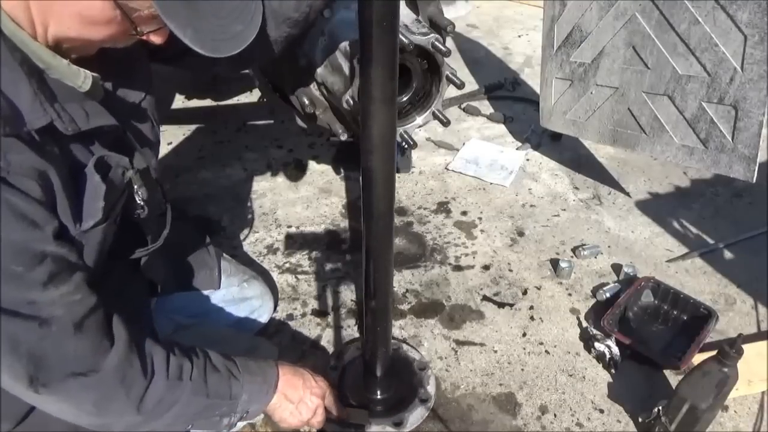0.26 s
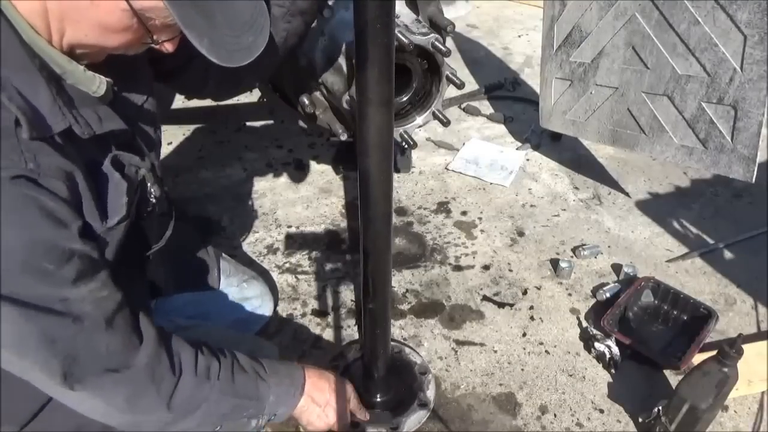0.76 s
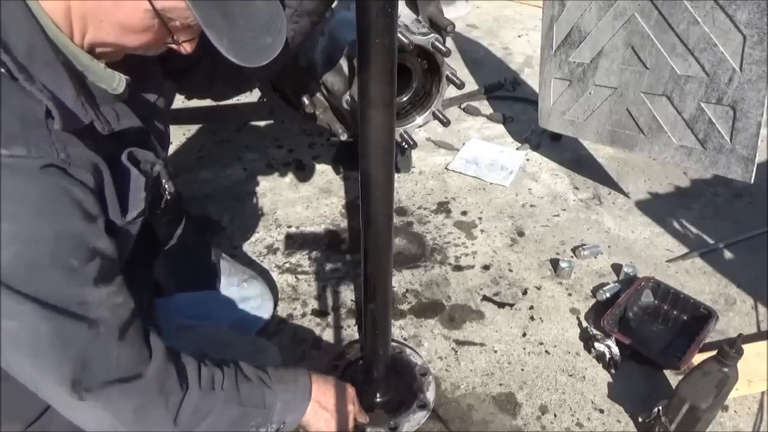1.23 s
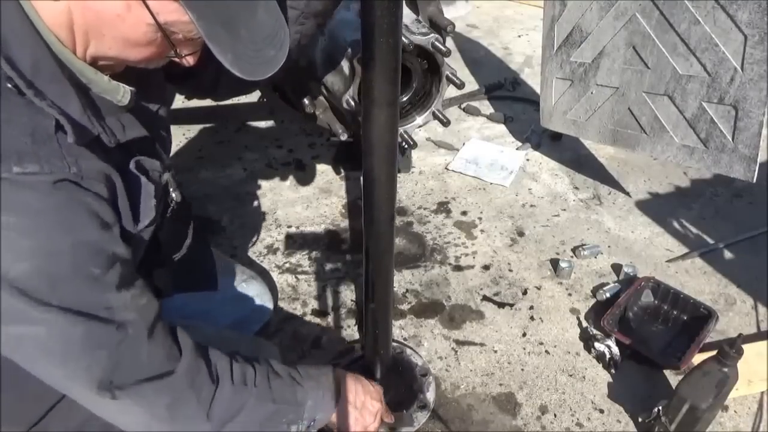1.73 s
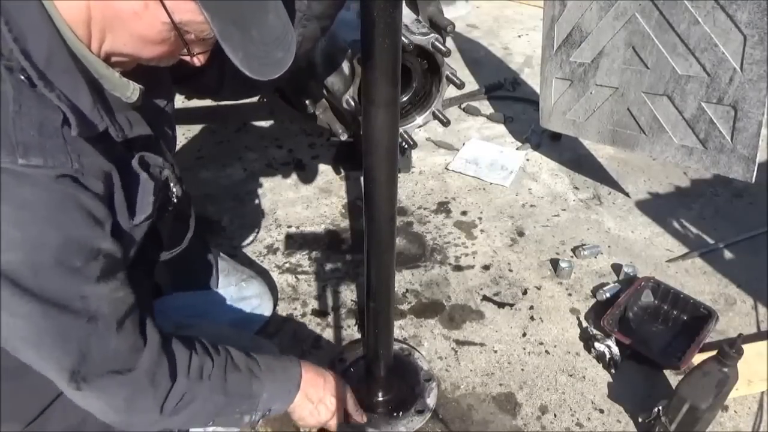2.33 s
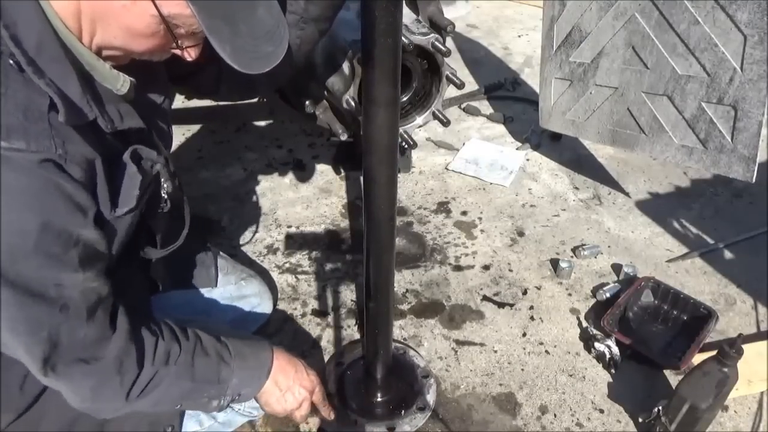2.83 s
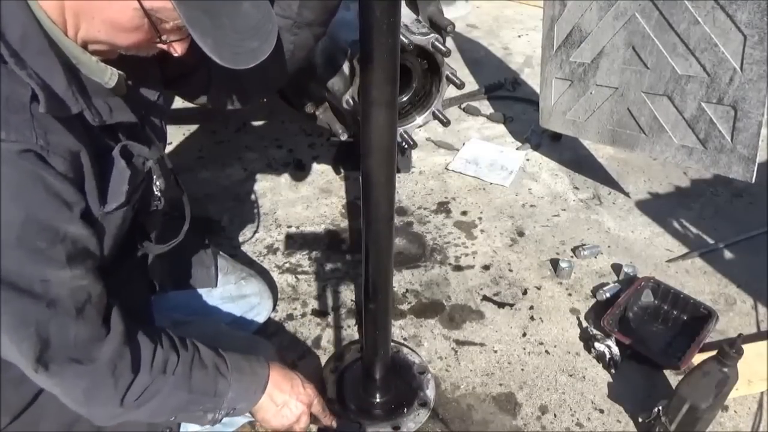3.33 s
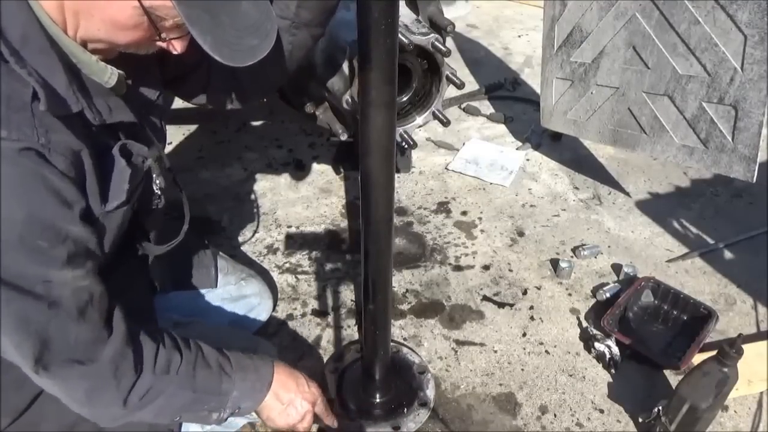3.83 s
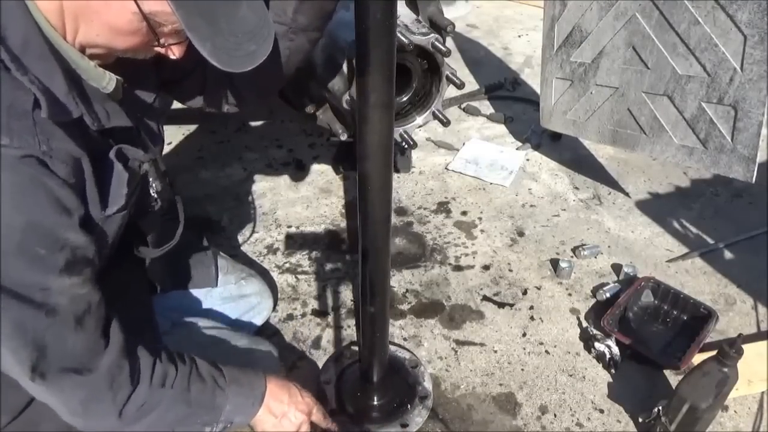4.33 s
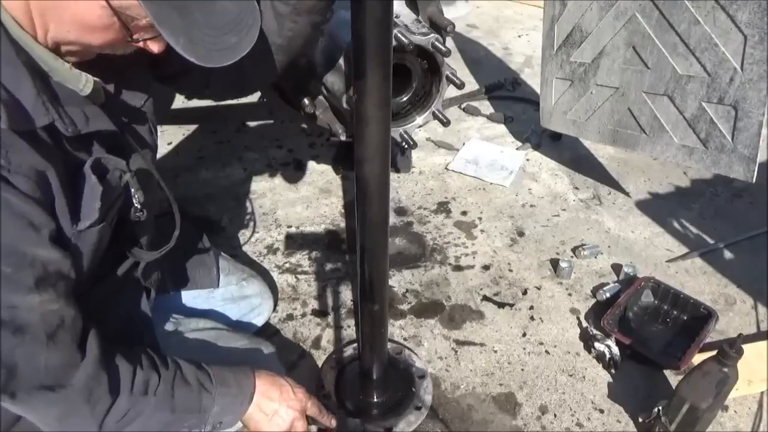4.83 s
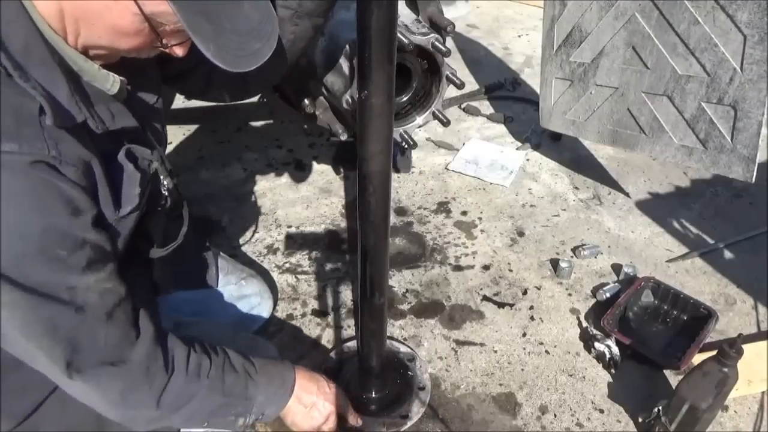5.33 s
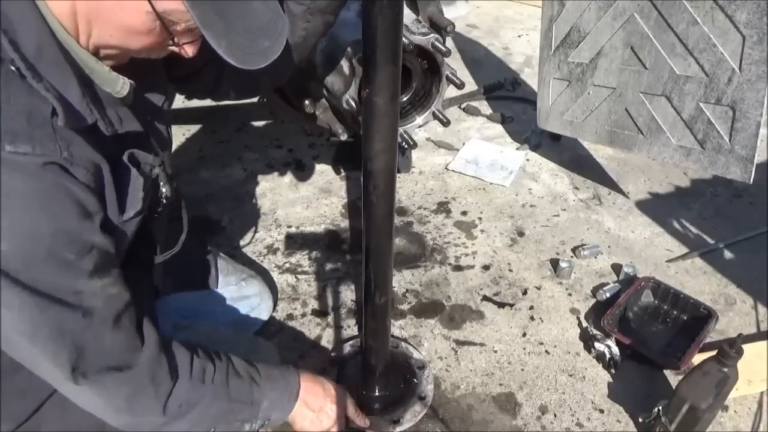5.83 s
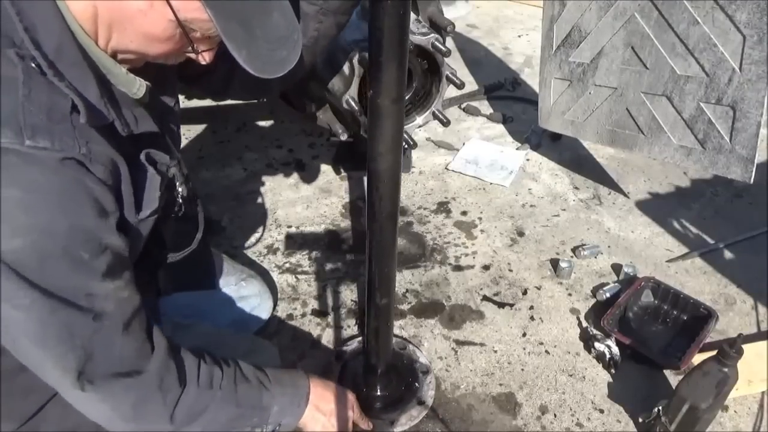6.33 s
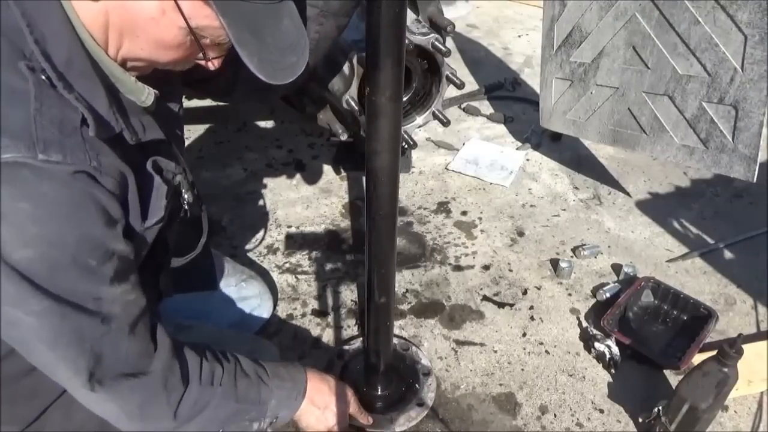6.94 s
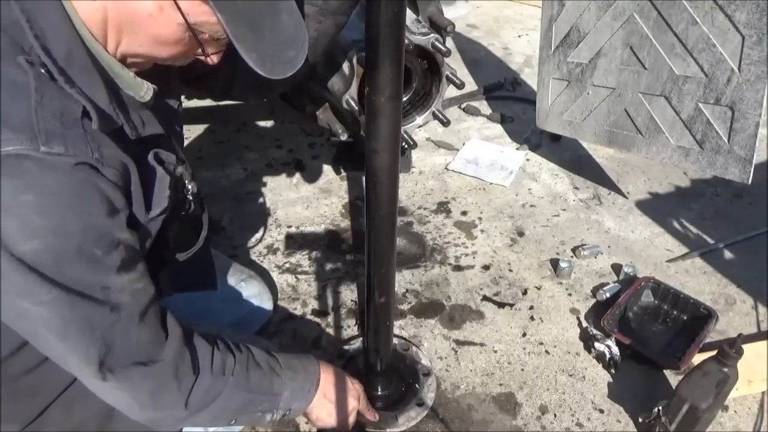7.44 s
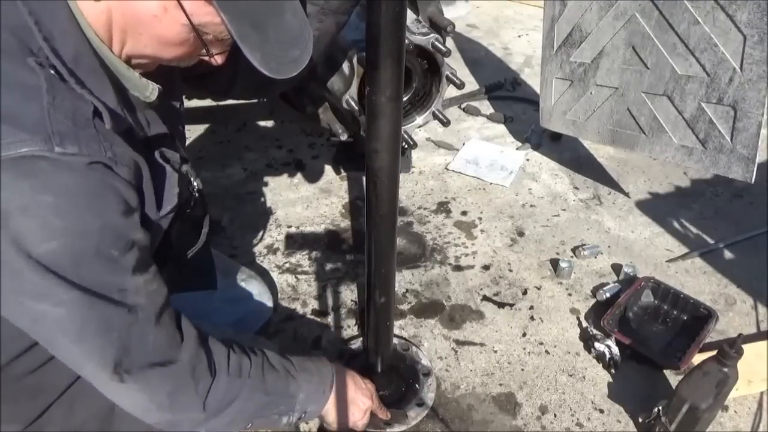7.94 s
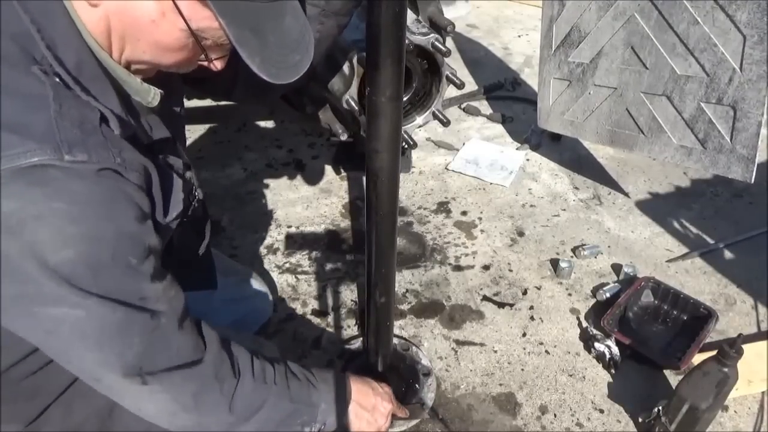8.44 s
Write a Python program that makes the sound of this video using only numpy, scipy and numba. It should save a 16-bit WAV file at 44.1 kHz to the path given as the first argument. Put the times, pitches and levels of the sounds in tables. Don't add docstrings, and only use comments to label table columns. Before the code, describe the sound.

Fast dry scrapes of a putty knife on steel come in runs: a strong early run, a broken middle with clicks and light contact, another vigorous run, a pause with taps, then softer ringing strokes. The sound is close, crisp and bassless, with only a short scatter off open concrete. Soft far traffic stays beneath, and low wind gusts buffet the microphone near the end.

```python
import sys
import numpy as np
from scipy import signal
from scipy.io import wavfile
from numba import njit

SR = 44100
rng = np.random.default_rng(int(sys.argv[2]) if len(sys.argv) > 2 else 0)


def persist_wave(psi):
    counts = np.round(np.clip(psi, -1, 1) * 32767).astype(np.int16)
    wavfile.write(sys.argv[1], SR, np.atleast_2d(counts).T)


def makeup_ratio(level_db):
    decades = np.asarray(level_db, float) / 20
    return 10 ** decades


N = 382347

# fastest moment in seconds, length in seconds, rasp level in dB,
# flange ring in dB relative to the rasp.
PUSH_STROKES = [(0.15, 0.12, -39, -5), (0.745, 0.089, -24.5, -6.5), (1.068, 0.089, -23.5, -7),
                (1.416, 0.086, -27, -9.5), (1.718, 0.062, -26, -4), (1.989, 0.053, -31.5, 1.5),
                (2.316, 0.075, -27.5, -2.5), (2.586, 0.051, -32.5, 3.8), (2.819, .02, -39.5, 4.5),
                (3.098, .066, -37.5, -0.3), (3.428, 0.075, -33.5, 2), (3.692, 0.063, -29, .3),
                (3.952, 0.061, -23.5, -0.5), (4.412, 0.082, -34.5, -3.5), (4.5, 0.056, -46.5, 3),
                (5.257, .088, -30, -4.5), (5.559, 0.073, -22, -4.5), (5.875, 0.082, -26, -1.5),
                (6.159, 0.061, -26, -6), (7.108, 0.052, -40, 0), (7.354, 0.052, -36.5, 2.5),
                (7.604, 0.059, -38, 4), (7.857, 0.063, -34, 5), (8.137, 0.07, -29.5, -2),
                (8.436, 0.076, -31, -1.5)]
PULL_STROKES = [(0.233, 0.1, -39, -6), (0.525, 0.077, -43.5, -6), (0.896, 0.074, -28.5, -9),
                (1.257, 0.083, -30, -7.5), (1.577, 0.079, -26.5, -15), (1.879, 0.085, -32.5, -3.5),
                (2.165, 0.083, -23.5, -7.5), (2.435, 0.051, -23.5, -13.5), (2.462, 0.082, -29.5, -2.5),
                (2.72, 0.083, -32, -3.5), (2.979, 0.04, -42, -2.5), (3.165, .058, -48.5, -4),
                (3.281, 0.045, -37, -4), (3.559, 0.062, -35, -2.5), (3.825, .058, -30, -7.5),
                (4.104, 0.071, -26.5, -12.5), (4.632, 0.098, -46.5, -3.5), (5.419, 0.064, -26.5, -10),
                (5.689, 0.06, -27.5, -4.5), (5.725, 0.1, -40.5, 2.5), (6.019, .055, -29, -4.5),
                (6.297, .05, -41.5, -3), (6.403, 0.019, -50.5, -6), (7.0, 0.032, -49.5, 3),
                (7.241, 0.05, -39, -4.5), (7.485, 0.048, -38.5, -3), (7.739, 0.048, -36, -7),
                (8.009, 0.064, -34, -6), (8.287, 0.069, -30.5, -7), (8.597, 0.077, -35, -6.5)]
PUSH_RISE, PULL_RISE = 0.54, 0.58
PUSH_EDGE_DB, PULL_EDGE_DB, EDGE_PER_DB = -1.06, -1, -0.13
HALF_GRIP_DB = -32.5

# frequency in Hz, width in Hz, level in dB, left minus right in dB.
BLADE_RESONANCES = [(1544, 53, -24.5, 3.5), (2170, 360, -13, 0), (2515, 86, -22.5, -15),
                    (3380, 540, -19.5, -4), (4310, 480, -9, 2), (5260, 1000, -14, 2.5),
                    (6356, 510, -1.5, 2.5), (7150, 500, -10.5, 6.5), (7805, 550, -8, 2.5),
                    (8880, 1100, -12, -8), (9556, 960, -3.5, 0.3), (10180, 800, -7, 1),
                    (10720, 500, -11, 1)]
# time in seconds, gain in dB of the upper edge
BLADE_BOW = [
    (0, -1),
    (2, -3),
    (4.4, -3.5),
    (5.2, -1),
    (6.4, -4.5),
    (7.1, 5),
    (8.6, 1),
]

# frequency in Hz, number of the mode family.
FLANGE_MODES = [(937, 1), (1421, 1), (1927, 2), (2025, 2), (2626, 0), (2830, 3), (3322, 3), (3774, 3),
                (4248, 4), (4834, 4), (4919, 3), (5933, 4), (6380, 4), (7000, 3), (7795, 3), (8354, 4),
                (8852, 3), (9020, 3), (9652, 3), (10135, 3), (10790, 3), (10919, 4)]
# level in dB, free decay time t60 in seconds, left minus right in dB.
FLANGE_RINGS = [(-12.5, 0.11, 4), (-11, 0.4, 1), (-11.5, 0.44, 0), (-5.5, 0.41, 2), (3.5, 0.24, 0),
                (-22, 0.26, 1), (-12.5, 0.5, 0), (-18.5, 0.28, 7), (-8.5, 0.3, -0.5), (-26.5, 0.25, 17),
                (-20.5, 0.44, 0), (-9, 0.32, 0), (-8.5, 0.16, 4), (-33, 0.77, 17), (-29, 0.65, -8),
                (-15, 0.24, -0.5), (-44, 0.31, 4), (-30, .5, 2), (-15.5, 0.42, -1), (-38, .4, 23),
                (-41, 0.2, 53), (-12, 0.18, -14.5)]
# dB per step towards the rim, dB per step round it, offset in dB.
MODE_FAMILIES = [
    (0, 0, -2),
    (1.2, 0.07, 1.77),
    (1.04, 0.52, -0.4),
    (1.12, 0.07, 0),
    (0.28, 1.14, -0.5),
]
# time in seconds, steps towards the rim, steps round the rim.
CONTACT_PATH = [(0.0, 3, 0), (0.36, 10, 3), (0.75, -2.5, 5.5), (1.08, -5, 4.5), (1.44, 1, -3.5),
                (2.16, -5, 4.5), (2.88, -3.5, -4.5), (3.24, -2.5, 0), (3.96, -4, 1), (4.32, 3.5, -3),
                (4.68, 7.5, -2), (5.04, 0.5, -3), (5.76, -9, 1), (6.48, 5.5, 2.5), (6.84, 0.5, -0.5),
                (7.56, 1, -10), (7.92, -2.5, -1.5), (8.64, -3.5, -3.5)]
PRESS_DAMP = 3.1
REST_DAMP, REST_S = 20.8, 0.063

# time in seconds, peak in dB, low flange modes in dB, high flange modes in dB,
# crack length in seconds.
BLADE_TAPS = [(0.393, -42, -21, -10, 0.0013), (2.82, -25.5, -15, -14, 0.002), (3.24, -32, -34, -41, 0.0025),
              (4.1794, -30, -21, -29, 0.0014), (4.2752, -39.5, 3.5, -30, 0.00095),
              (4.4544, -17, -24, -27, 0.0012), (4.7696, -40, -4, -20, 0.0015),
              (5.0089, -21.5, -29, -25, 0.0033), (6.6149, -30, -45, -19, 0.00098),
              (6.6328, -21.5, -33, -31, 0.0028), (6.7779, -23, -31, -25, 0.0038),
              (6.9875, -37, -22, -30, 0.002), (7.375, -42, -22, -5, 0.001), (7.62, -42, -17, -10, 0.001),
              (7.885, -39, -22, -6, 0.001), (6.4118, -18.5, -6, -27, 0.0029)]
# time in seconds, peak in dB.
EDGE_CATCHES = [
    (1.2027, -23),
    (3.903, -31),
    (4.3635, -14),
    (5.499, -11),
    (5.8228, -12),
    (6.12, -12),
    (7.3163, -23),
    (7.5666, -17.5),
    (7.811, -18),
    (8.098, -11.5),
]
# time in seconds, ring level in dB, fade in seconds.
NUDGES = [(0.002, -36.5, 0.015), (0.3, -59, .02), (0.408, -46.5, 0.094), (2.84, -41, .02),
          (2.9, -34.5, 0.019), (4.178, -30.5, .018), (4.283, -36.5, 0.019), (4.68, -50, 0.079),
          (4.771, -40, 0.09), (4.93, -37.5, 0.038), (5.044, -39, 0.0082), (5.07, -68, 0.055),
          (6.385, -39, 0.021), (6.46, -56, .08), (6.57, -58, .04), (6.64, -54, .012), (6.79, -61, .012),
          (6.82, -56, 0.075), (6.93, -65, .04)]
NUDGE_RISE_S, NUDGE_RASP_DB = 0.016, -25

# strongest moment in seconds, level in dB, half length in seconds.
WIND_GUSTS = [(0.236, -62, 0.067), (1.22, -73, 0.11), (1.87, -56.5, 0.027), (2.92, -75, 0.13),
              (3.6, -59.5, 0.19), (4.26, -55, 0.054), (4.9, -55, 0.1), (5.618, -66, 0.3),
              (6.417, -61, 0.043), (6.807, -42, 0.045), (7.298, -31, 0.021), (7.476, -41.5, 0.058),
              (7.72, -39, 0.046), (7.848, -31, 0.065), (8.026, -34, 0.048), (8.166, -37, 0.046),
              (8.376, -33.5, 0.061), (8.582, -36.5, 0.048)]
BREEZE_DB = -75
# frequency in Hz, level in dB per Hz.
TOWN_SPECTRUM = [(18, -33), (30, 0), (89, 0.5), (466, -9), (782, -4), (1810, -14), (2000, -13.5),
                 (2380, -26), (2690, -22), (3040, -21.5), (11000, -22), (14300, -57), (22000, -120)]
TOWN_DB = -52


def level(x, db):
    return x * makeup_ratio(db) / np.sqrt(np.mean(x ** 2))


def band(x, hz, width):
    return signal.lfilter(*signal.iirpeak(hz, hz / width, SR), x)


def walk(rate):
    levels = rng.standard_normal(4000)
    return 1.2 * np.interp(np.arange(N) * rate / SR, np.arange(len(levels)), levels)


def pan(x, db):
    return x * makeup_ratio(np.array([[db], [-db]]) / 2)


def swell(s, rise, fall, edge=2.53):
    first, last = max(int((s - 0.5) * SR), 0), min(int((s + 0.5) * SR), N)
    i = np.arange(first, last)
    late = i / SR - s
    return i, np.exp(-np.abs(late / np.where(late < 0, rise, fall)) ** edge)


def strokes():
    power = np.full((3, N), 1e-12)
    pushes = PUSH_STROKES, PUSH_RISE, PUSH_EDGE_DB
    pulls = PULL_STROKES, PULL_RISE, PULL_EDGE_DB
    for rows, share, edge_db in (pushes, pulls):
        for s, length, rasp_db, ring_db in rows:
            i, bell = swell(s, share * length, (1 - share) * length)
            tilt_db = edge_db + EDGE_PER_DB * (rasp_db - HALF_GRIP_DB)
            power[:, i] += makeup_ratio(rasp_db + np.array([[0], [ring_db], [tilt_db]])) ** 2 * bell
    return np.sqrt(power)


def grit(shared, own_db, rate):
    slips = makeup_ratio(shared + own_db * walk(rate))
    return level(slips * rng.standard_normal(N), 0)


def blade(rasp, edge, crack):
    slips = 1.9 * walk(330) + 1.2 * walk(60)
    bow_db = np.interp(np.arange(N) / SR, *np.transpose(BLADE_BOW))
    out = 0
    for hz, width, db, pan_db in BLADE_RESONANCES:
        share = np.clip((hz - 6500) / 2500, 0, 1)
        bow_share = np.clip((hz - 9900) / 200, -1, 1) * (hz > 9000)
        patches = makeup_ratio(2.7 * walk(18) + bow_db * bow_share)
        speed = rasp ** (1 - share) * edge ** share
        drive = speed * patches * grit(slips, own_db=1.5, rate=200)
        tone = band(band(drive + 0.95 * crack, hz, 1.47 * width), hz, 1.47 * width)
        out = out + pan(makeup_ratio(db) * np.sqrt(SR / width / 6) * tone, pan_db)
    return out


@njit
def ring(x, turn, loss):
    y, z = np.empty(len(x)), 0j
    for i in range(len(x)):
        z = z * turn * (1 - loss[i]) + x[i]
        y[i] = z.imag
    return y


def flange(drive, rasp, blows):
    grip = rasp / (rasp + makeup_ratio(HALF_GRIP_DB))
    low_blows, high_blows = blows
    rest = signal.lfilter([1], [1, -np.exp(-1 / (REST_S * SR))], 1. * (low_blows > 0))
    force = drive * grit(0.72 * walk(90), own_db=2.5, rate=300)
    s, *place = np.transpose(CONTACT_PATH)
    out_step, round_step = (np.interp(np.arange(N) / SR, s, step) for step in place)
    favour = [out_db * out_step + round_db * round_step + db for out_db, round_db, db in MODE_FAMILIES]
    out = 0
    for (hz, family), (db, t60, pan_db) in zip(FLANGE_MODES, FLANGE_RINGS):
        linger = REST_DAMP * np.minimum(rest, 1) * (hz < 3000)
        loss = (np.log(1000) / t60 + PRESS_DAMP * grip + linger) / SR
        high = np.clip(np.log(hz / 1400) / 0.8, 0, 1)
        blow = low_blows ** (1 - high) * high_blows ** high
        node = makeup_ratio(favour[family] + 1.75 * walk(4.945))
        push = node * (0.04 * force + 1.5 * blow)
        out = out + pan(makeup_ratio(db) * ring(push, np.exp(2j * np.pi * hz / SR), loss), pan_db)
    return out


def taps():
    crack, blows = np.zeros(N), np.zeros((2, N))
    catches = [(s, db - 12.0, -30, -30, 0.004) for s, db in EDGE_CATCHES]
    for s, db, low_db, high_db, length in list(BLADE_TAPS) + catches:
        i = int(s * SR)
        noise = rng.standard_normal(1000)
        crack[i:i + 1000] += makeup_ratio(db) * noise * np.exp(-np.arange(1000) / (SR * length))
        blows[:, i] = makeup_ratio(db + np.array([low_db, high_db]))
    return crack, blows


def nudges():
    light = np.zeros(N)
    for s, db, fade in NUDGES:
        i, shape = swell(s, NUDGE_RISE_S, fade, edge=1)
        light[i] += makeup_ratio(db) * shape
    return light


def ground(x):
    t = np.arange(6000) / SR
    decay = np.exp(-t / 0.013) + 0.037 * np.exp(-t / 0.048)
    tails = rng.standard_normal((2, len(t))) * decay * (t > 0.0005)
    tails /= np.sqrt((tails ** 2).sum(axis=1, keepdims=True))
    scatter = signal.fftconvolve(x.mean(axis=0, keepdims=True), tails, axes=1)[:, :N]
    return x + makeup_ratio(-13.0) * scatter


def gusts():
    power = makeup_ratio(BREEZE_DB + 5.2 * walk(8.1)) ** 2
    for s, db, half in WIND_GUSTS:
        i, bell = swell(s, half, half, edge=1.72)
        power[i] += makeup_ratio(db) ** 2 * bell
    return np.sqrt(power)


def wind():
    gust = gusts()
    puffs = makeup_ratio(2.15 * walk(25))
    thump = level(band(band(rng.standard_normal(N) * puffs, 89, 98), 95, 116), 0)
    both, left, right = (level(band(band(rng.standard_normal(N) * puffs, 140, 320), 160, 410), 0)
                         for _ in range(3))
    flutter = makeup_ratio(-1.5) * gust * gust / (gust + makeup_ratio(-25))
    eddy = makeup_ratio(0.5) * gust * thump + 1.2 * flutter * both
    later = np.roll(eddy, 40)
    return np.array([eddy + 1.3 * flutter * left, later + 0.54 * flutter * right])


def town():
    out, surge = 0, walk(0.2)
    hzs, dbs = np.transpose(TOWN_SPECTRUM)
    for hz in 30 * 2 ** np.arange(0, 8.6, 0.5):
        mid, side = (band(band(rng.standard_normal(N), hz, hz / 2), hz, hz / 2) for _ in range(2))
        flicker = (1.2 + 0.18 * hz / 1000) * walk(7)
        db = np.interp(np.log(hz), np.log(hzs), dbs) + 0.15 * surge + flicker
        width = np.clip(hz / 1800, 0.18, 0.4)
        out = out + makeup_ratio(db) * (mid + width * side * np.array([[1], [-1]]))
    return level(out, TOWN_DB)


def scene():
    rasp, drive, edge = strokes()
    light = nudges()
    brush = light * makeup_ratio(NUDGE_RASP_DB)
    crack, blows = taps()
    steel = blade(rasp + brush, edge + brush, crack) + flange(drive + 0.47 * light, rasp, blows)
    steel = signal.sosfilt(signal.butter(4, 1150, "high", fs=SR, output="sos"), steel)
    return ground(steel) + town() + wind()


def low_pass(x):
    return signal.sosfilt(signal.butter(12, 12360, fs=SR, output="sos"), x)


def record(dry):
    cut = signal.sosfilt(signal.ellip(14, 0.3, 60, 11000, fs=SR, output="sos"), dry)
    return low_pass(cut)


dry = scene()
out = record(dry)
persist_wave(out)
```